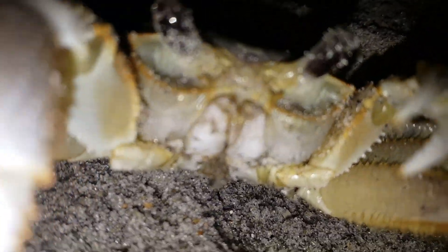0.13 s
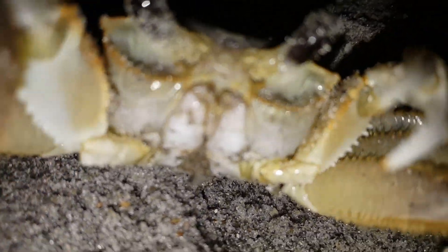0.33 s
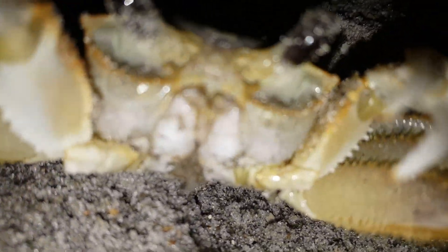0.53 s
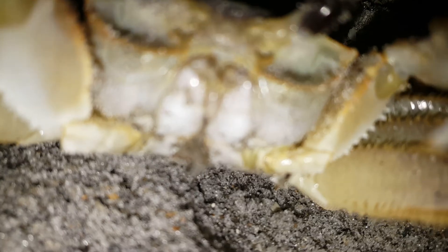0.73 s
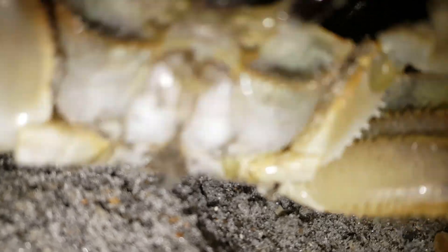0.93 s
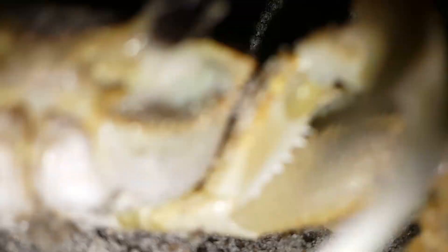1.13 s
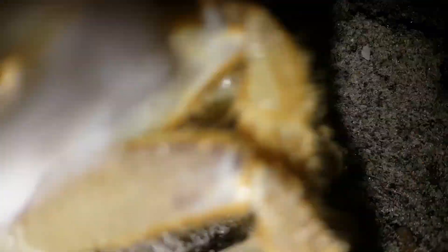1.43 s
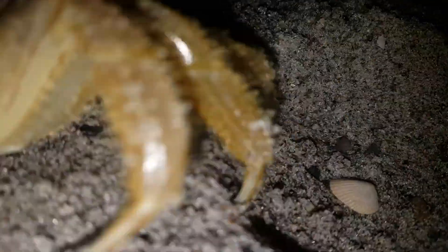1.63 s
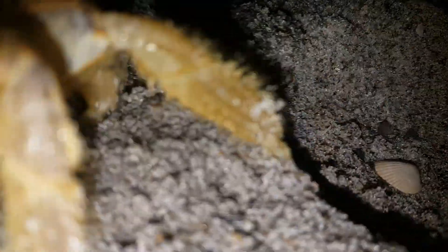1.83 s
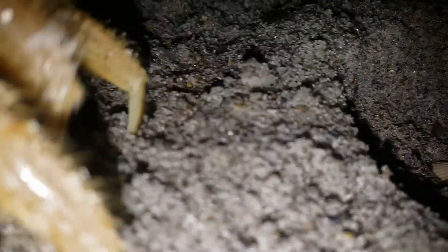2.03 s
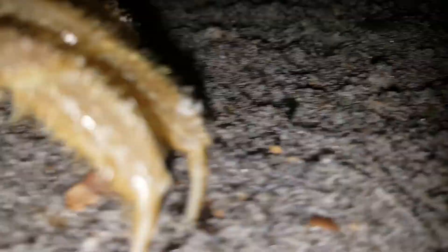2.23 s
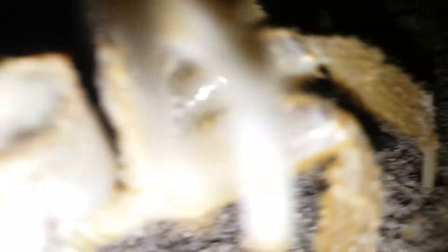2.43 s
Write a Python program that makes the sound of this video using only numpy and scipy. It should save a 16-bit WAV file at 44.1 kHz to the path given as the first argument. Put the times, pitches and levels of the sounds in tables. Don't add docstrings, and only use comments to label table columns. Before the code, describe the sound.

Wind buffeting a microphone in late, heavy low thumps over faint distant surf on a beach

```python
import sys
import numpy as np
from scipy import signal
from scipy.io import wavfile
from scipy.ndimage import uniform_filter1d

SR = 44100
rng = np.random.default_rng(int(sys.argv[2]) if len(sys.argv) > 2 else 0)


def generate_wav(sig):
    pcm = np.round(np.clip(np.atleast_2d(sig).T, -1, 1) * 32767).astype(np.int16)
    wavfile.write(sys.argv[1], SR, pcm)


def voltage_ratio(level):
    return 10 ** (np.asarray(level, float) / 20)


N = 113337


def in_time(rows):
    seconds, *columns = np.transpose(rows)
    return [np.interp(np.arange(N) / SR, seconds, column) for column in columns]


def at_hz(points, hz):
    table_hz, values = np.array(points).T
    return np.interp(np.log(hz), np.log(table_hz), values)


def rms_one(x):
    return x / np.sqrt(np.mean(x ** 2) + 1e-20)


def sides(pan_db):
    return voltage_ratio(np.array([[pan_db / 2], [-pan_db / 2]]))


def place(db, pan_db):
    return voltage_ratio(db - abs(pan_db) / 2) * sides(pan_db)


def drift(rate_hz):
    pole = np.exp(-40 * np.pi * rate_hz / SR)
    white = rng.standard_normal(N // 20 + 2002)
    slow = signal.lfilter([1], [1, -2 * pole, pole * pole], white)[2000:]
    return np.interp(np.arange(N) / 20, np.arange(len(slow)), rms_one(slow))


def cut(x, hz, kind, order=2):
    return signal.sosfilt(signal.butter(order, hz, kind, fs=SR, output="sos"), x + 1e-18)


def ring(clicks, hz, t60_s):
    radius, angle = voltage_ratio(-60 / (t60_s * SR)), 2 * np.pi * hz / SR
    feedback = [1, -2 * radius * np.cos(angle), radius * radius]
    return signal.lfilter([0, np.sin(angle)], feedback, clicks + 1e-18)


# start in seconds, length in seconds, left level in dB, right level in dB.
PUFFS = [(0.339, 0.039, -28.5, -34), (0.482, 0.021, -26.5, -41), (0.604, .025, -37, -35),
         (0.657, 0.048, -32, -28.5), (1.189, 0.027, -26, -45), (1.427, 0.24, -30, -29.5),
         (1.492, 0.016, -22.5, -26), (1.537, 0.045, -27, -41), (1.608, 0.018, -18, -20),
         (1.64, 0.036, -22.5, -25), (1.772, 0.1, -27.5, -48), (1.843, 0.09, -24.5, -22.5),
         (1.921, 0.036, -17.5, -13.5), (1.968, 0.055, -16, -15), (2.033, 0.03, -24.5, -30),
         (2.049, 0.014, -24, -24), (2.064, 0.044, -19, -24.5), (2.134, 0.025, -18.5, -25),
         (2.155, 0.15, -27.5, -25.5), (2.186, 0.039, -34, -23.5), (2.25, 0.03, -31, -38),
         (2.339, 0.02, -25, -21), (2.359, 0.048, -18.5, -22), (2.413, 0.024, -18.5, -18),
         (2.434, 0.041, -19.5, -15.5), (2.483, 0.02, -14.5, -19), (2.503, 0.017, -15, -12.5),
         (2.525, .014, -17, -10), (2.541, .021, -18.5, -13)]


def wind_force():
    calm_db, edge_s = -37, .012
    lump_db, lumps_per_s = 1.5, 15.3
    t = np.arange(N) / SR
    power = np.full((2, N), voltage_ratio(2 * calm_db))
    for start, length, left_db, right_db in PUFFS:
        to_nearest_edge = np.minimum(t - start, start + length - t)
        shape = np.clip(to_nearest_edge / edge_s + .5, 0, 1)
        power = power + voltage_ratio(2 * np.array([[left_db], [right_db]])) * shape ** 2
    lumps = np.array([drift(lumps_per_s), drift(lumps_per_s)])
    return np.sqrt(power) * voltage_ratio(lump_db * lumps)


def shed_eddies():
    eddies_per_s, spread_db = 1500, 3.5
    sizes = voltage_ratio(spread_db * np.minimum(rng.exponential(1, (2, N)), 4))
    signs = rng.choice([-1, 1], (2, N))
    return rms_one(sizes * signs * (rng.random((2, N)) < eddies_per_s / SR))


# frequency in Hz, density in dB per Hz.
BUFFET = [(15, -61), (25, -17), (113, 3.5), (277, 0), (375, 1.5), (593, -9.5), (706, -13), (1100, -17.5),
          (1430, -35.5), (2420, -120)]


def buffeting(eddies):
    edges = np.geomspace(BUFFET[1][0], BUFFET[-2][0], 12)
    body = 0
    for k, (low, high) in enumerate(zip(edges, edges[1:])):
        gain = (-1) ** k * voltage_ratio(at_hz(BUFFET, np.sqrt(low * high)))
        body = body + gain * cut(eddies, [low, high], "band")
    port = rms_one(ring(eddies, 370.4, 0.053))
    return rms_one(rms_one(body) + voltage_ratio(-20.5) * port)


def wind():
    force, eddies = wind_force(), shed_eddies()
    body = buffeting(eddies)
    even_s, evening = 0.019, 0.99
    body_power = uniform_filter1d(body ** 2, int(even_s * SR), axis=1)
    steadied = force * (body_power + 0.37) ** (-evening / 2)

    rim_left, crackle_left = voltage_ratio([[-6], [0]]), voltage_ratio([[-13], [0]])
    rim = rms_one(cut(cut(eddies, 970, "high"), 1210, "low", order=4))
    whistle_hz = [600, 950]
    whistle = rms_one(cut(cut(eddies, whistle_hz, "band"), whistle_hz, "band"))
    crackle = rms_one(cut(eddies * abs(eddies), [1000, 1800], "band"))

    sharp = voltage_ratio(-23.5) * rim_left * rim
    whistle = voltage_ratio(-9) * rim_left * force / 0.23 * whistle
    crackle = voltage_ratio(-22) * crackle_left * (force / 0.2) ** 2 * crackle
    return steadied * (body + sharp + whistle + crackle)


# peak time in seconds, peak level in dB, left minus right in dB,
# sharpness (low-pass) in Hz.
SLAPS = [(1.4533, -20, -20, 700), (1.4899, -10, -27, 860), (1.499, -15, 20, 654), (1.5428, -12.5, 20, 630),
         (1.6072, -24, -24, 1100), (1.61, -15.5, 22, 800), (1.649, -14.5, 24, 715), (1.671, -19.5, 20, 650),
         (1.8945, -20, 20, 706), (1.9032, -13.5, -30, 1260), (1.9108, -14, -29, 1340),
         (1.9286, -21, -20, 1100), (1.9353, -9, 25, 705), (1.9385, -3.5, -24, 1050),
         (1.9503, -7.5, 25, 750), (1.9504, -14, -26, 1500), (1.9692, -8.5, 25, 700), (1.9787, 1, -18, 1800),
         (1.982, -7, 25, 755), (1.989, -7, 23, 1000), (1.992, -11, -25, 1260), (1.9936, -1.5, 15, 1080),
         (2.0057, -4, 19, 746), (2.01, -4.5, -22, 1000), (2.017, -5, 18, 1000), (2.0743, -14, 22, 800),
         (2.0788, -15, -24, 890), (2.082, -12.5, 27, 760), (2.091, -11.5, 27, 800),
         (2.1498, -8.5, -43, 1400), (2.201, -12, 28, 800), (2.203, -8, -25, 790), (2.341, -17, 20, 700),
         (2.3443, -11.5, -22, 800), (2.35, -10, -25, 1030), (2.391, -15, -22, 900), (2.4031, -10, 25, 700),
         (2.429, -14, 25, 700), (2.4417, 1, -30, 1210), (2.457, -9, -17, 1300), (2.4626, -11, 30, 960),
         (2.4803, -7, -30, 1000), (2.5066, -7.5, -20, 1490), (2.5113, 0, -31, 1270), (2.514, -16, 25, 850),
         (2.5318, -8, -28, 1390), (2.541, -14, -25, 1200), (2.5457, -3.5, -25, 1610),
         (2.5582, -5.5, -25, 1300)]


def slaps():
    swing_hz, swing_t60_s, swing_spread = 340, .016, .3
    t = np.arange(2000) / SR
    out = np.zeros((2, N + 2000))
    for (peak_s, db, pan_db, sharp_hz), size in zip(SLAPS, rng.uniform(-1.03, 1, len(SLAPS))):
        hz = swing_hz * (1 + swing_spread * size)
        swing = np.cos(2 * np.pi * hz * t) * voltage_ratio(-60 * t / swing_t60_s)
        slap = cut(cut(swing, sharp_hz, "low", order=4), 35, "high")
        i = int(peak_s * SR) - np.argmax(slap)
        out[:, i:i + 2000] += place(db, pan_db) * slap / slap.max()
    return out[:, :N]


# centre in seconds, peak level in dB, pitch in Hz,
# length in seconds, left minus right in dB.
HEAVES = [(0.292, -32.5, 101, 0.064, 14), (0.564, -30.5, 73.4, 0.029, 4), (0.677, -37, 100, 0.036, 9),
          (1.365, -36, 89, 0.045, 8), (1.489, -22.5, 95, 0.024, -0.5), (1.547, -19, 198, 0.041, 16),
          (1.643, -32, 105, .06, 10), (1.852, -32.5, 107, 0.07, 7), (1.933, -14.5, 133, 0.026, 3.5),
          (1.99, -24, 140, 0.025, 0), (2.083, -28.5, 69.5, 0.033, 4), (2.207, -25, 111, 0.031, -14),
          (2.288, -33, 90, 0.032, -4), (2.341, -21.5, 75.6, 0.026, 12), (2.383, -16.5, 111.5, .04, 12),
          (2.43, -21.5, 100, 0.027, -4), (1.45, -32.5, 111, 0.041, 1), (1.589, -32.5, 97, .05, -0.5),
          (2.151, -28.5, 70, 0.037, -5), (1.9826, -11, 200, 0.004, -22), (1.995, -13.5, 271, 0.029, 7),
          (2.022, -20, 816, 0.012, 5), (2.069, -12.5, 436, 0.011, 20), (1.198, -19, 423, 0.0091, 8),
          (1.653, -23.5, 303, 0.036, 6), (2.4415, -4.5, 330, 0.004, -27), (2.47, -10, 537, 0.0093, -30),
          (2.517, -10, 663, 0.0066, -14), (2.531, -12, 734, 0.012, -14)]


def heaves():
    t = np.arange(N) / SR
    out = np.zeros((2, N))
    for centre, db, hz, length, pan_db in HEAVES:
        bell = np.exp(-(2 * (t - centre) / length) ** 2)
        out += place(db, pan_db) * bell * np.sin(2 * np.pi * hz * (t - centre))
    return out


# start in seconds, peak level in dB, pitch in Hz, left minus right in dB.
TICKS = [(1.0788, -34, 6800, 14), (1.0865, -30, 13000, 5), (1.3875, -33, 6340, 16.5),
         (1.5074, -40, 6500, 10), (1.5177, -32, 13500, 10), (1.6344, -34, 6600, 17), (2.075, -38, 6500, 8),
         (2.138, -38, 10000, 10), (2.2521, -38, 10000, 10), (2.501, -35, 6500, 7), (2.5015, -28, 2150, 16),
         (2.5018, -28, 11500, 12), (2.54, -35, 7000, 12)]


def ticks():
    grit_s, ring_cycles = .0012, 11
    out = np.zeros((2, N))
    fade = np.exp(-np.arange(800) / SR / grit_s)
    for start, db, hz, pan_db in TICKS:
        grit = rng.standard_normal(800) * fade
        click = grit / np.sqrt(np.sum(grit ** 2))
        tick = cut(ring(click, hz, ring_cycles / hz), [.7 * hz, 1.3 * hz], "band", order=1)
        i = int(start * SR)
        out[:, i:i + 800] += place(db + 4, pan_db) * tick
    return out


# frequency in Hz, left minus right in dB.
SHADE = [(2500, 4.5), (4400, 2.5), (6000, -7), (8500, -8), (10500, 0.5), (13000, 0), (15500, -17)]
# frequency in Hz, likeness from 0 to 1.
LIKENESS = [(60, 1), (120, 0), (250, 1), (700, 0.44), (2000, 0.88), (4000, 0.11), (12000, 0.07)]


def far_noise(spectrum, patchy_db, wander_db, shade):
    lag = 18
    out, together = 0, .5 * drift(2.0) + 1.3 * drift(21.0)
    bottom, top = spectrum[0][0], spectrum[-1][0]
    edges = np.geomspace(bottom, top, int(3 * np.log2(top / bottom)) + 2)
    white = rng.standard_normal((2, 2, N + 4000))
    for k, (low, high) in enumerate(zip(edges, edges[1:])):
        mid, side = cut(white[k % 2], [low, high], "band")[:, 4000 - lag:]
        hz = np.sqrt(low * high)
        alike = np.clip(at_hz(LIKENESS, hz), 0, 1)
        shared, apart = np.sqrt(1 + alike) * mid, np.sqrt(1 - alike) * side
        ports = np.array([(shared + apart)[:N], (shared - apart)[lag:]])
        flicker_db = patchy_db * (0.91 * together + 0.87 * drift(20))
        wandering_db = wander_db * np.array([drift(0.94), drift(0.82)])
        gain = voltage_ratio(at_hz(spectrum, hz) + flicker_db + wandering_db)
        out = out + gain * ports * sides(shade * at_hz(SHADE, hz))
    return rms_one(out)


# frequency in Hz, density in dB per Hz.
SURF = [(25, -27), (112, -9.5), (215, -0.5), (310, -5.5), (456, -2), (900, -16.5), (1150, -27.5),
        (3200, -38.5)]
# time in seconds, level in dB.
SWELL = [(0, 2), (.5, 1), (.68, 2), (.8, 1.5), (1.0, 2), (1.3, 1.5), (2.57, 2)]


def surf_rumble():
    swell_db, = in_time(SWELL)
    return voltage_ratio(-30.5 + swell_db) * far_noise(SURF, patchy_db=0.5, wander_db=0.31, shade=0)


# frequency in Hz, density in dB per Hz.
FOAM = [(2400, -8.5), (3400, -6.5), (4300, -2.5), (6000, -4), (7000, -3.5), (8200, -6.5), (12500, -8),
        (16500, -25.5)]
# time in seconds, level in dB, left minus
# right in dB.
WASH = [(0, -56, -2.5), (.55, -56, -4), (.95, -53.5, -2), (1.08, -51, 0.5), (1.2, -54.5, -4),
        (1.35, -54, -3), (1.5, -54.5, -2), (1.75, -54.5, -5.5), (1.9, -54.5, -2), (1.93, -57.5, -4),
        (1.99, -58, -5), (2.04, -56, -3.5), (2.25, -55, -3.5), (2.4, -56.5, -4), (2.57, -55.5, 0)]


def foam_hiss():
    wash_db, pan_db = in_time(WASH)
    balance = voltage_ratio(np.array([pan_db / 2, -pan_db / 2]))
    return voltage_ratio(wash_db + 3) * balance * far_noise(FOAM, patchy_db=0.7, wander_db=.8, shade=0.73)


def scene():
    surf = surf_rumble() + foam_hiss()
    return surf + wind() + heaves() + slaps() + ticks()


def top_cut(x):
    return signal.sosfilt(signal.butter(12, 15830, fs=SR, output="sos"), x)


def record(dry):
    ceiling, cutoff_hz = .95, 15800
    rounded = ceiling * np.tanh(dry / ceiling)
    steep = signal.cheby2(24, 70, cutoff_hz * 1.015, fs=SR, output="sos")
    mix = signal.sosfilt(steep, rounded)
    return top_cut(mix)


dry = scene()
out = record(dry)
generate_wav(out)
```